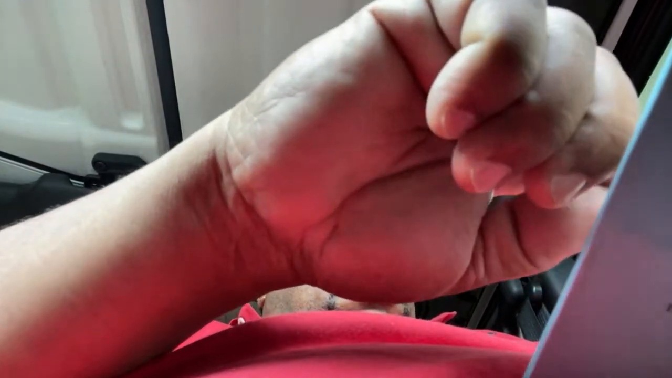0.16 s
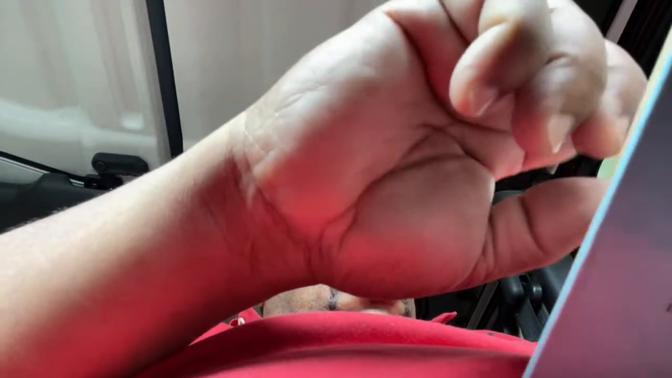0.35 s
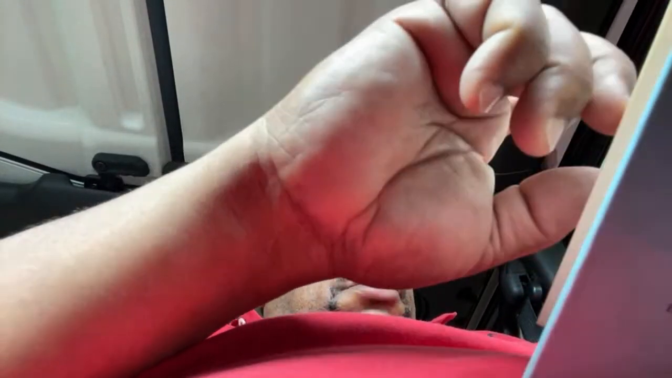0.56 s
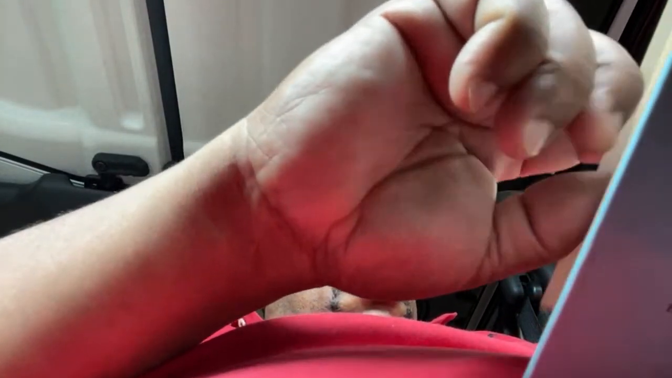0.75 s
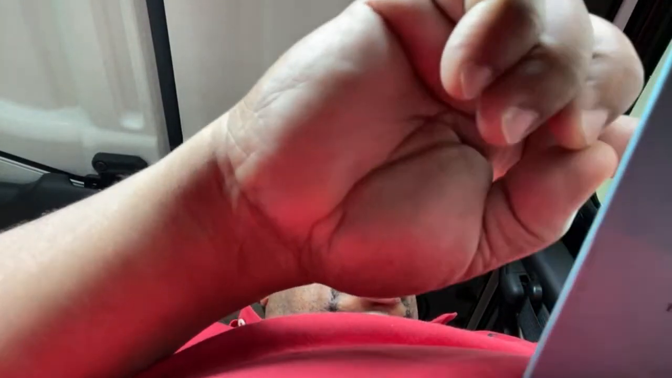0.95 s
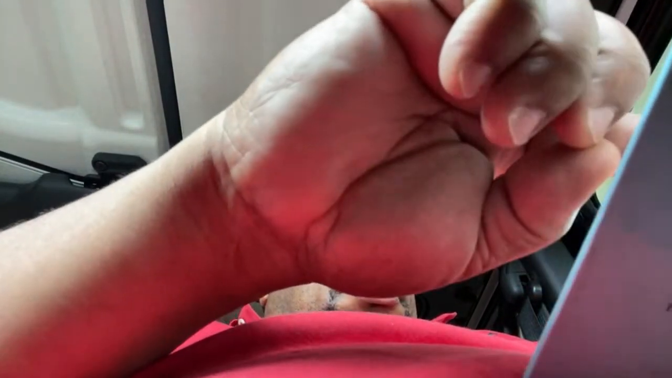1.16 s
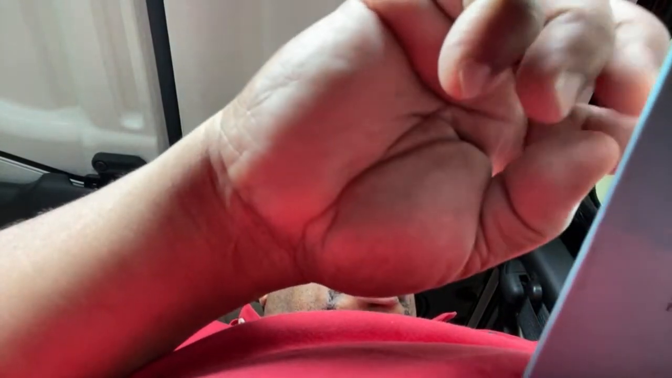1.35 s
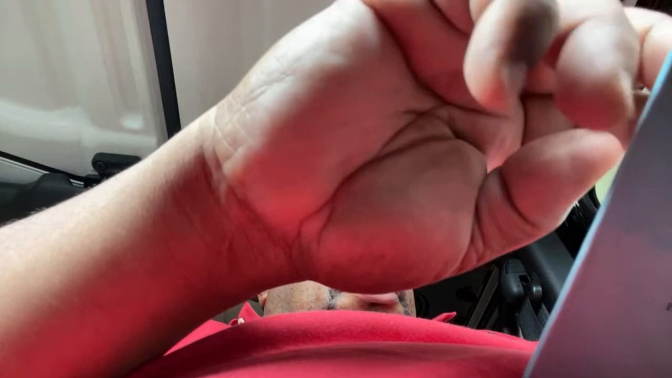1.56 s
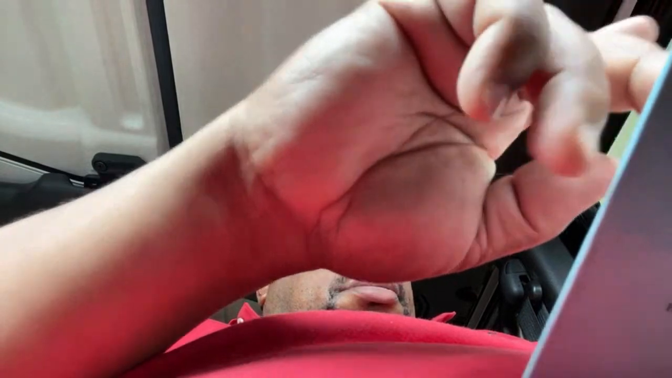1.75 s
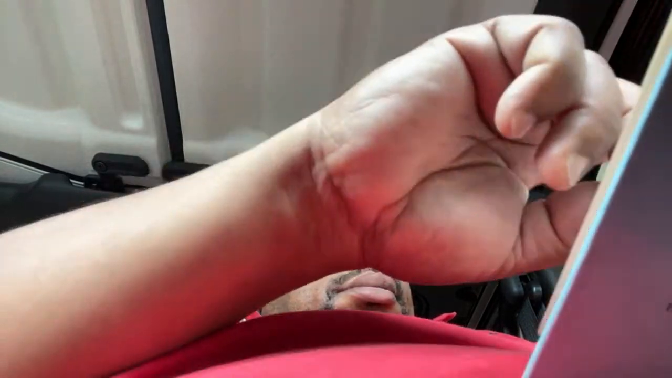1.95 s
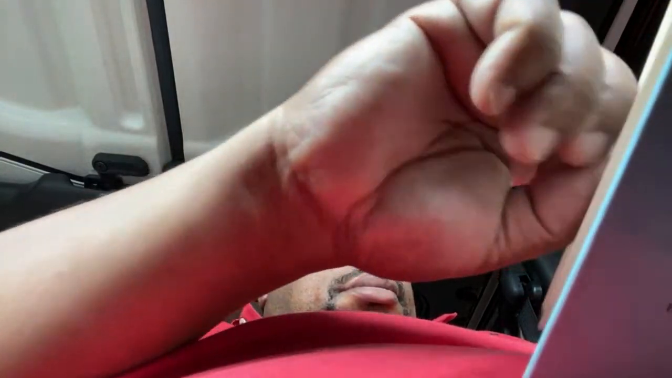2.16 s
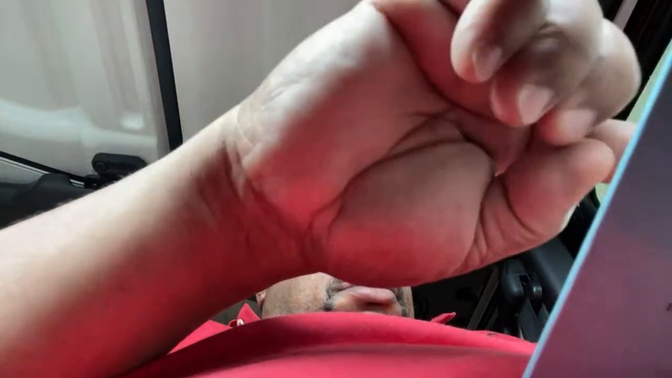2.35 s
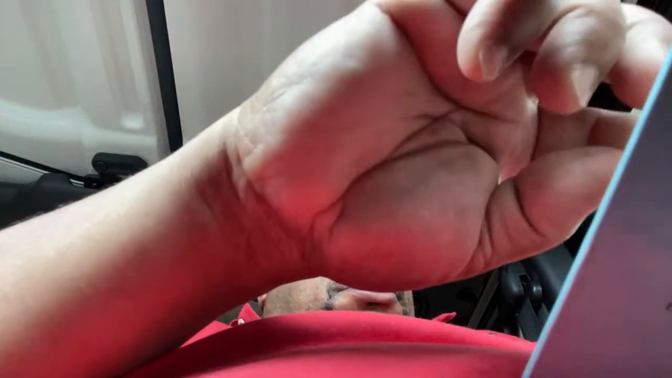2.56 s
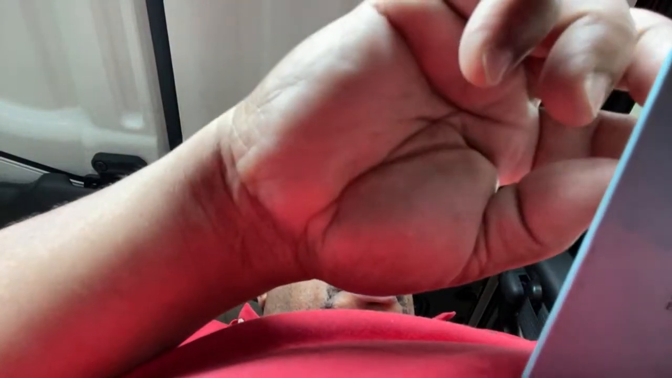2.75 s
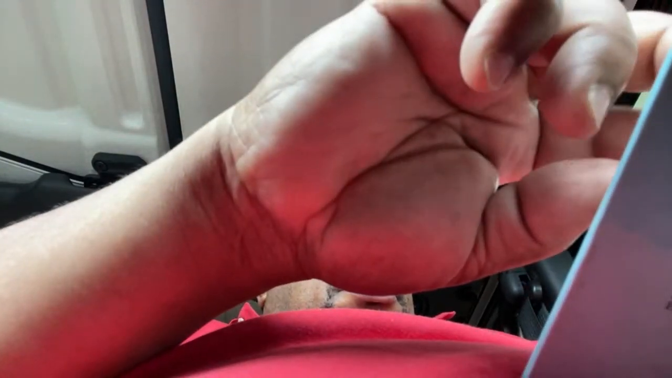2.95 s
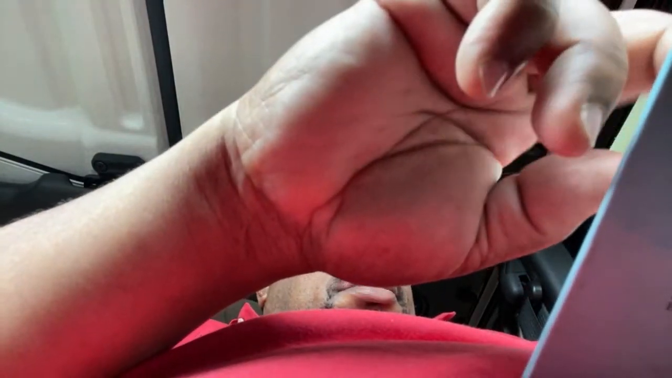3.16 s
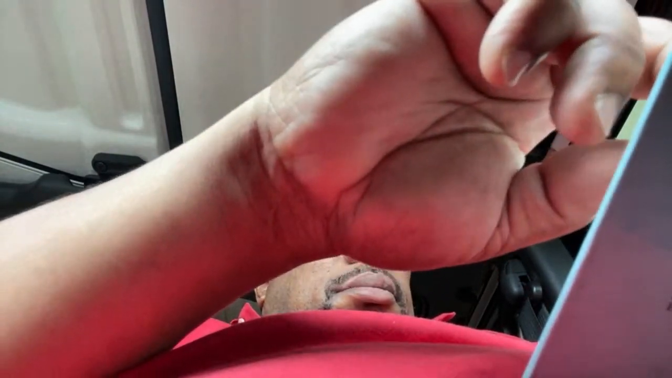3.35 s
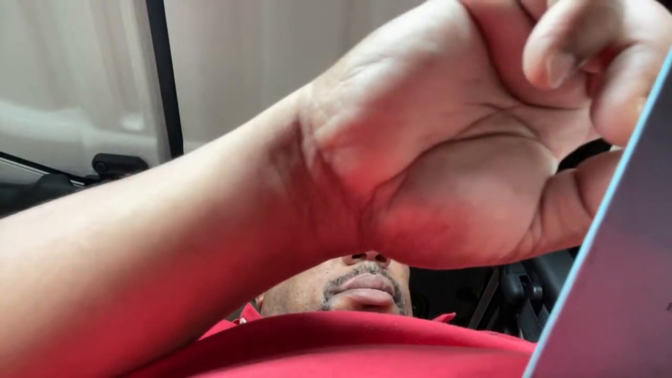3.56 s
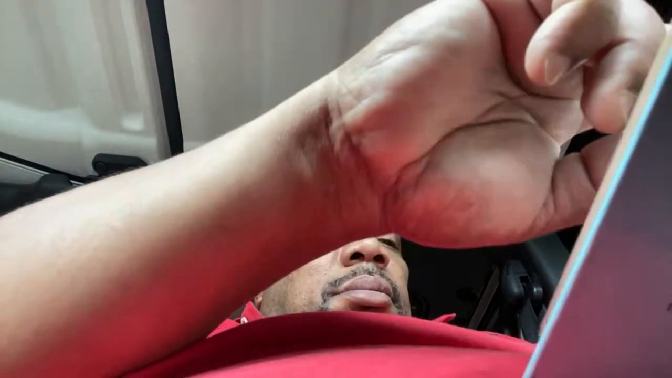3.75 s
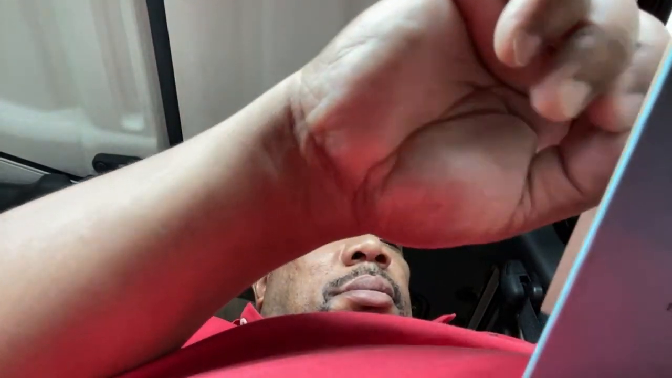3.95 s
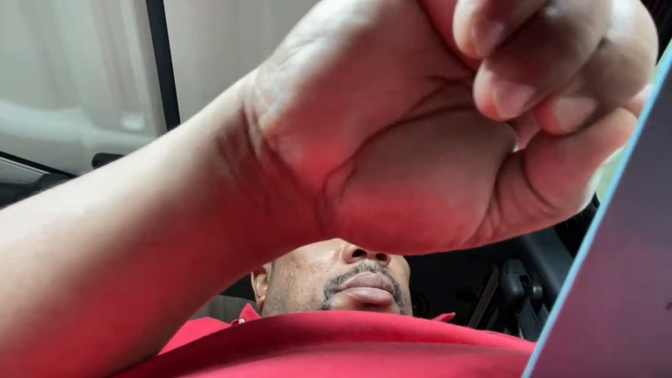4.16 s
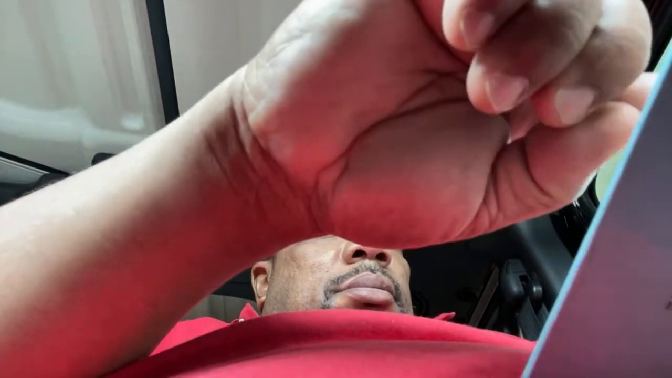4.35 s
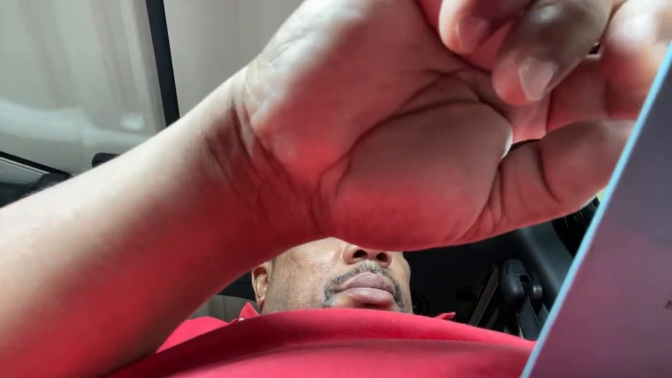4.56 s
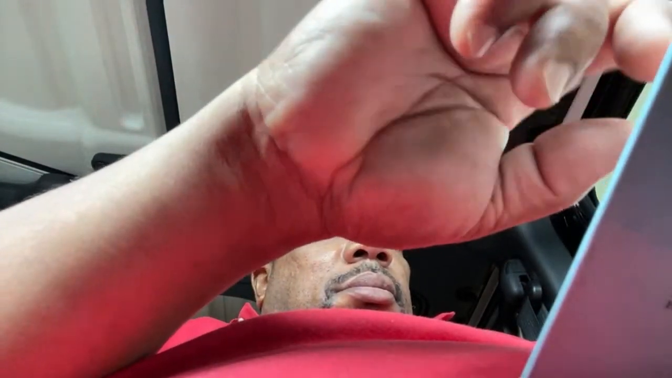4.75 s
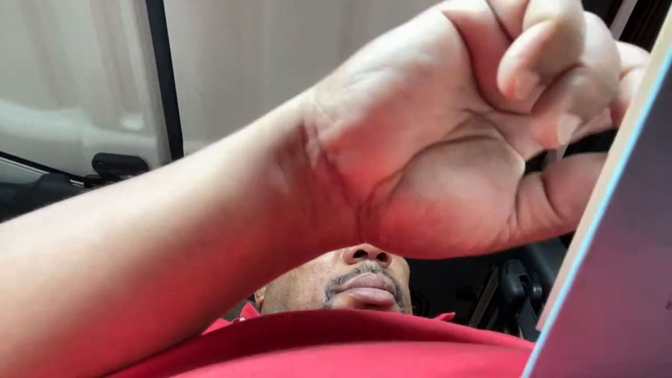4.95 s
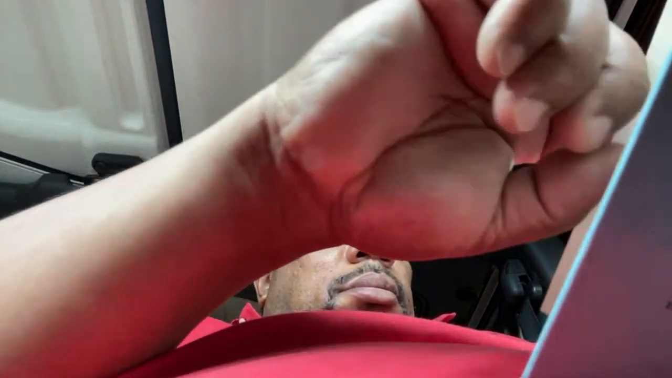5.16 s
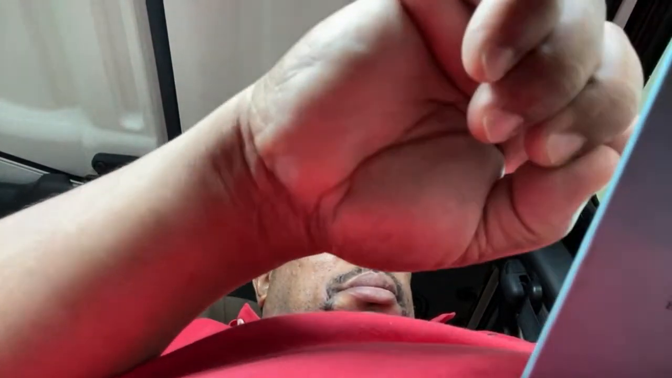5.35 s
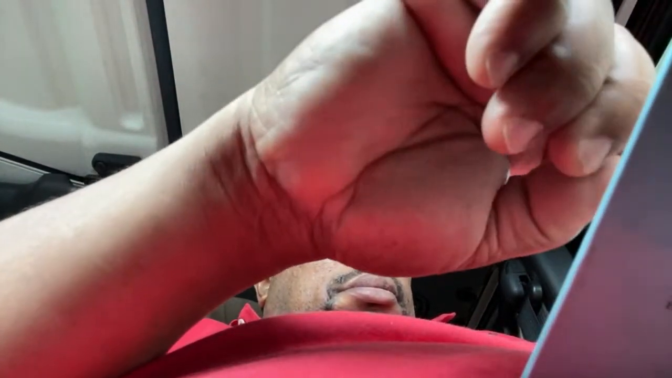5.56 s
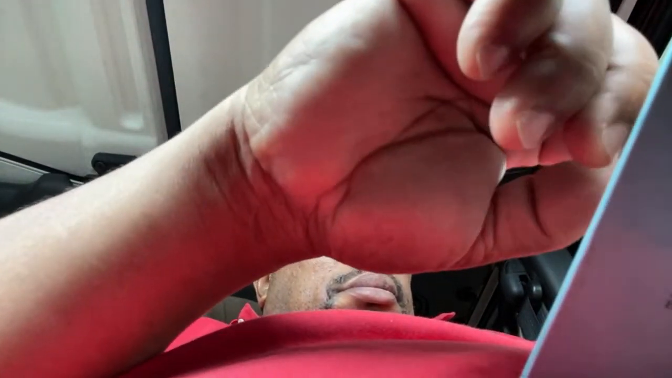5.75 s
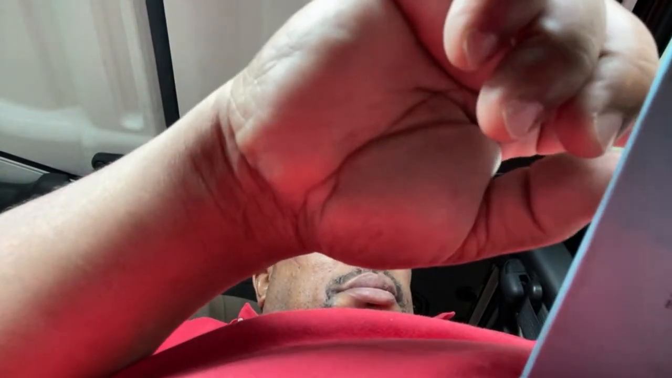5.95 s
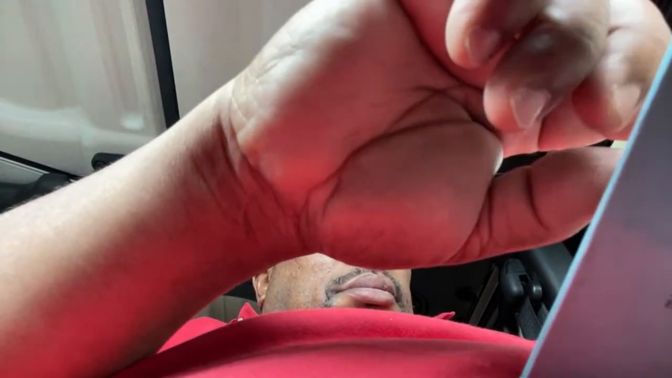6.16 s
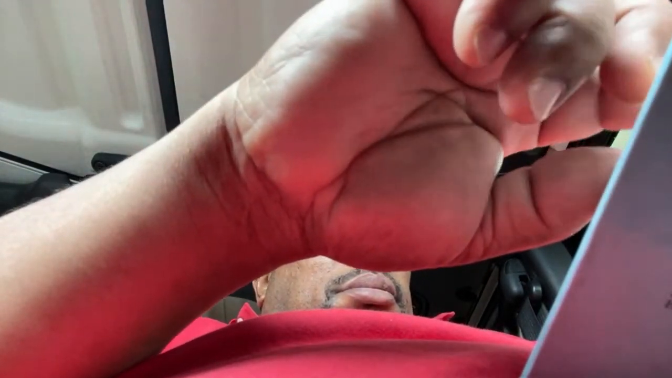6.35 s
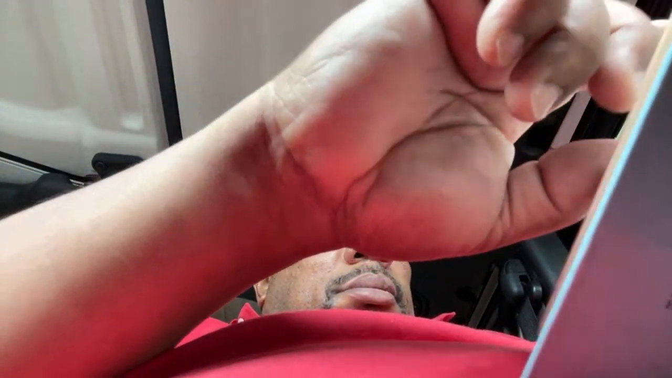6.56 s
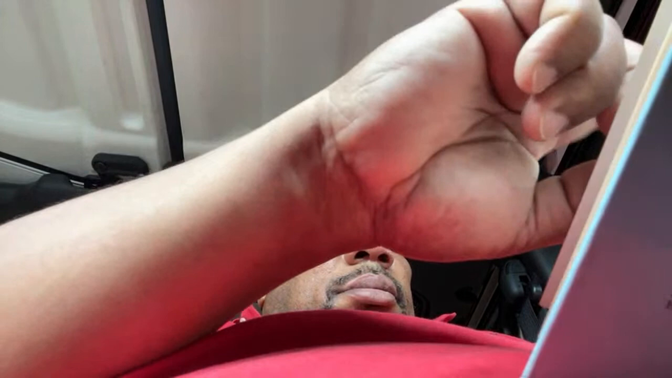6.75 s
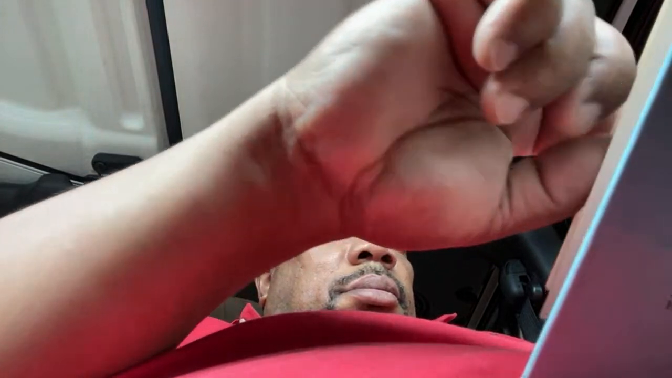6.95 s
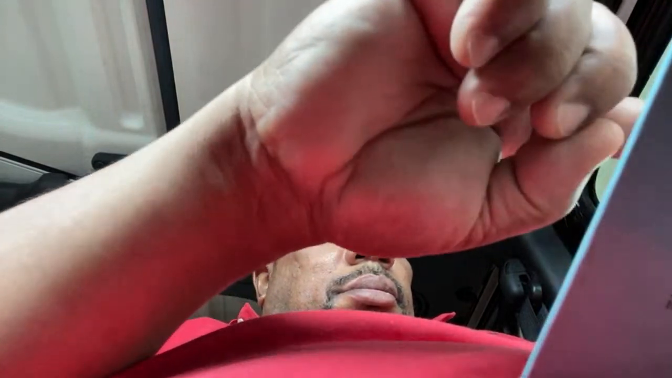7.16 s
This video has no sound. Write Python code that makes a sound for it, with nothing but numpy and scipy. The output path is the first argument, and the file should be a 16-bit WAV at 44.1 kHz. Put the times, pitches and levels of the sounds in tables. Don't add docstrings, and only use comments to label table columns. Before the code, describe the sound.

The setting is the small, dry cabin of a parked vehicle, heard through a close speech microphone with little deep bass or extreme treble. A faint, steady ventilation hum, mostly low-mid and airy, runs throughout above a very soft, slightly flickering rumble. For the first two seconds there are only tiny skin ticks, around 0.4 and 1.3, and dull low bumps through the seat. At about 2.05-2.11 a fingertip presses the tablet: a crackly onset, then a loud, hard, bright click with a thin slab knock and glassy edge, gone almost at once. Around 3.89-3.97 comes a softer, gritty double click, scratchier then duller. At 5.09 a compact, woody-glassy tap sounds. Faint ticks and thuds continue, including a tick at 5.6 and bumps after 6.1. At 6.92 a last, very light touch barely clicks, and the hum continues to about 7.2.

```python
import sys
import numpy as np
from scipy import signal
from scipy.io import wavfile
from scipy.ndimage import uniform_filter1d

SR = 44100
rng = np.random.default_rng(int(sys.argv[2]) if len(sys.argv) > 2 else 0)


def transcribe(u):
    v = np.clip(np.atleast_2d(u).T, -1, 1)
    q = np.round(v * 32767).astype(np.int16)
    wavfile.write(sys.argv[1], SR, q)


def level_to_linear(level):
    exponent = np.asarray(level, float) / 20
    return 10 ** exponent


N = 317017

# peak time in seconds, slab level in dB, frame level in dB, glass level in dB.
SLIPS = [(2.0502, -39.5, -45, -56), (2.0535, -46, -33, -52), (2.067, -42, -34, -52),
         (2.0716, -42, -25.5, -41), (2.077, -36, -27, -34), (2.0837, -5, -17, -11), (2.088, -38, -23, -21),
         (2.0918, -15, -25, -30), (2.096, -26, -30, -24.5), (2.1024, -26, -29, -34),
         (2.11, -25, -29.5, -43), (3.8855, -26, -42, -53), (3.8963, -32, -36, -38), (3.8994, -20, -30, -23),
         (3.903, -21, -25, -24), (3.906, -34, -20.5, -24), (3.9131, -24.5, -33, -33),
         (3.9222, -27, -28, -38), (3.9285, -32, -30, -45), (3.9425, -24.5, -43, -48),
         (3.9485, -29.5, -36, -53), (3.954, -30, -30.5, -60), (3.9628, -42, -28.5, -58),
         (5.0877, -24.5, -39, -32), (5.0935, -19, -32, -24), (5.0978, -17.5, -32, -27),
         (5.1055, -25, -33, -37), (6.913, -47, -45.5, -47), (6.917, -32, -51, -55),
         (6.9202, -31.5, -52, -57)]
# start in seconds, slab pitch in Hz, frame pitch in Hz, skin release in seconds.
PITCHES = [
    (0, 1250, 2400, 2.08),
    (2.075, 1215, 2750, 2.131),
    (2.2, 1170, 2250, 3.968),
    (4.5, 1150, 2650, 5.134),
    (6, 1290, 2650, 6.927),
]
# start in seconds, boost of the longest-ringing glass mode in dB,
# tilt of the glass modes around it in dB per octave, glass pitch scatter as a fraction, scratch level in dB.
LANDINGS = [
    (0, -1, -5, 0.05, -5),
    (3, -3, 4, .14, -1),
    (4.5, 4, 0, .06, -4),
    (6, -5, -1, .1, 1),
]
# slab in dB, frame in dB, glass in dB.
CHATTER_DROP_DB = [6.5, 4.5, 5]
# factor on the frame pitch, level in dB, t60 in seconds.
FRAME_MODES = [(.8, -7, 0.016), (1, -3, 0.012), (1.2, -10.5, 0.029), (1.42, -19, 0.013)]
# pitch in Hz, level in dB, t60 in seconds.
GLASS_MODES = [(4085, -14.5, 0.031), (4280, -10, 0.0058), (4900, 2, 0.025), (5470, -10, 0.028),
               (6340, -3, .02), (6980, -12, 0.0086), (7470, -22, 0.014), (8400, -39, 0.019)]
# time in seconds, peak level in dB, pitch in Hz.
TICKS = [(0.393, -49.5, 6320), (1.2994, -54, 6270), (2.187, -54, 5700), (2.2338, -52, 6100),
         (2.2952, -54, 6340), (2.517, -49, 6740), (4.2074, -49.5, 6340), (4.3695, -51.5, 5820),
         (5.624, -47, 6410), (6.979, -58, 6600)]
# time in seconds, peak level in dB, pitch in Hz.
THUDS = [(0.555, -51.5, 220), (0.869, -58, 186), (1.064, -62, 129), (1.176, -47.5, 219), (1.393, -60, 191),
         (1.804, -56, 153), (2.075, -48.5, 107), (2.522, -56, 200), (2.652, -55, 234), (2.733, -56, 164),
         (3.461, -60, 220), (3.894, -60, 180), (4.132, -57, 240), (4.196, -56, 228), (4.371, -56, 236),
         (4.497, -57, 236), (5.006, -53, 170), (5.316, -61, 199), (5.626, -62, 148), (6.143, -49.5, 210),
         (6.566, -51, 210), (6.765, -51.5, 210)]
# frequency in Hz, density in dB per Hz.
HUM_SPECTRUM = [(265, -25.5), (318, 1), (400, -7.5), (560, -6), (860, -9.5), (1000, -14.5), (1350, -20),
                (1690, -16), (2500, -24), (3100, -21.5), (3900, -26.5), (5000, -24), (6700, -25.5),
                (9000, -66.5)]
# frequency in Hz, density in dB per Hz.
RUMBLE_SPECTRUM = [(25, -25.5), (60, -10), (120, -3), (170, 0.5), (260, -3.5), (400, -27.5)]
# time in seconds, rumble level in dB.
RUMBLE_LEVEL = [(0, -73), (1.4, -69), (2.05, -75), (2.7, -73), (7.19, -75)]

CHATTER_S, CHATTER_MOST = 0.004, 5
CHATTER_SCATTER_DB, CHATTER_JITTER_S = 5, 0.0015
SLAB_WANDER, FRAME_WANDER = 0.22, 0.14
SLAB_RISE_MS, FRAME_RISE_MS, GLASS_RISE_MS = 1.94, 2.195, 2.1
SLAB_T60_S, SCRATCH_T60_S, CABIN_T60_S = 0.0072, 0.014, 0.055
SCRATCH_LOW_HZ, SCRATCH_HIGH_HZ = 2600, 7220
TOUCH_LOW_HZ, LEAD_S = 810, 0.0007
TICK_MS, TICK_DULL_DB = 13.7, -4
THUD_MS = 25.0
CABIN_DB, HUM_DB, HISS_DB = -14, -52, -94


def touches():
    slips = chatter()
    out = slab(slips)
    factor, frame_mode_db, frame_t60 = np.transpose(FRAME_MODES)
    glass_hz, base_db, glass_t60 = np.transpose(GLASS_MODES)
    longest_hz = glass_hz[np.argmax(glass_t60)]
    rubs = scratches(len(slips))
    lucks = rng.random((len(slips), 2, 16))
    for (s, _, frame_db, glass_db, _, frame_hz), luck, rub in zip(slips, lucks, rubs):
        _, longest_db, tilt_db, scatter, scratch_db = landing(s)
        picked_db = base_db + longest_db * (glass_hz == longest_hz) + tilt_db * np.log2(glass_hz / longest_hz)
        frame = ring(frame_hz * factor, frame_mode_db, frame_t60, FRAME_RISE_MS, 0.07, luck[0])
        glass = ring(glass_hz, picked_db, glass_t60, GLASS_RISE_MS, scatter, luck[1])
        scratch = level_to_linear(scratch_db - 2) * rub * swell(GLASS_RISE_MS, SCRATCH_T60_S)
        add(out, s - FRAME_RISE_MS / 1000, level_to_linear(frame_db) * frame)
        add(out, s - GLASS_RISE_MS / 1000, level_to_linear(glass_db - 2) * (glass + scratch))
    return out


def chatter():
    rows = []
    luck = rng.random((len(SLIPS), CHATTER_MOST + 1, 6)) - 0.5
    next_s = [row[0] for row in SLIPS[1:]] + [np.inf]
    for (s, *firm_db), until, draws in zip(SLIPS, next_s, luck):
        _, slab_hz, frame_hz, lift_s = [row for row in PITCHES if row[0] <= s][-1]
        for k, draw in enumerate(draws):
            if k > 0 and s + (k + 0.5) * CHATTER_S >= min(until, lift_s):
                continue
            loose = min(k, 1)
            at = s + k * CHATTER_S + loose * CHATTER_JITTER_S * draw[0]
            scatter_db = loose * CHATTER_SCATTER_DB * 2 * draw[1:4]
            levels_db = firm_db - k * np.array(CHATTER_DROP_DB) + scatter_db
            slab_now_hz = slab_hz * (1 + SLAB_WANDER * draw[4])
            frame_now_hz = frame_hz * (1 + FRAME_WANDER * draw[5])
            rows.append((at, *levels_db, slab_now_hz, frame_now_hz))
    return rows


def slab(slips):
    s, slab_db, hz = np.transpose(slips)[[0, 1, 4]]
    level = np.zeros(N)
    for at, db in zip(s, slab_db):
        add(level, at - SLAB_RISE_MS / 1000, level_to_linear(db) * swell(SLAB_RISE_MS, SLAB_T60_S))
    pitch_hz = np.interp(np.arange(N) / SR, s, hz)
    return level * np.sin(2 * np.pi * np.cumsum(pitch_hz) / SR)


def ring(hz, db, t60, rise_ms, spread, luck):
    t = np.arange(SR // 20) / SR
    shift, phase = luck[:2 * len(hz)].reshape(2, -1, 1)
    shifted_hz = hz[:, None] * (1 + spread * (shift - 0.5))
    waves = np.sin(2 * np.pi * (shifted_hz * t + phase))
    modes = level_to_linear(db)[:, None] * swell(rise_ms, t60[:, None]) * waves
    return modes.sum(0) / np.linalg.norm(level_to_linear(db))


def scratches(count):
    band = signal.butter(3, [SCRATCH_LOW_HZ, SCRATCH_HIGH_HZ], "band", fs=SR, output="sos")
    grit = signal.sosfilt(band, rng.standard_normal((count, SR // 20)))
    return evened(signal.sosfilt(signal.butter(12, SCRATCH_HIGH_HZ, fs=SR, output="sos"), grit))


def landing(s):
    return [row for row in LANDINGS if row[0] <= s][-1]


def swell(rise_ms, t60):
    t = np.arange(SR // 20) / SR
    rise_s = max(rise_ms, 0.3) / 1000
    rise = np.sin(np.pi / 2 * np.minimum(t / rise_s, 1)) ** 2
    return rise * level_to_linear(-60 * np.maximum(t - rise_s, 0) / t60)


def cabin(x):
    t = np.arange(SR // 6) / SR
    sign = rng.choice([-1.0, 1.0], len(t))
    present = (rng.random(len(t)) < 0.12) * (t > 0.002)
    taps = sign * present * level_to_linear(-60 * t / CABIN_T60_S)
    return signal.oaconvolve(x, taps / np.linalg.norm(taps))[:N]


def ticks():
    out = np.zeros(N)
    u = np.arange(2000) / SR * 1000 / (0.22 * TICK_MS)
    puff = u * np.exp(1 - u)
    for (s, db, hz), grit in zip(TICKS, rng.standard_normal((len(TICKS), 2, 2000))):
        bright = evened(signal.lfilter(*signal.iirpeak(hz, 5.5, SR), grit[0]))
        dull = evened(signal.lfilter(*signal.iirpeak(3600, 1.1, SR), grit[1]))
        add(out, s - 0.002, level_to_linear(db - 6.5) * (bright + level_to_linear(TICK_DULL_DB) * dull) * puff)
    return signal.sosfilt(signal.butter(10, 7100, fs=SR, output="sos"), out)


def thuds():
    out = np.zeros(N)
    u = np.linspace(0, 1, int(THUD_MS * SR / 1000))
    for (s, db, hz), luck in zip(THUDS, rng.random((len(THUDS), 2))):
        turns = np.cumsum(hz * (1.15 - 0.32 * u)) / SR
        push = np.sin(2 * np.pi * (turns + luck[0]))
        push += 0.39 * np.sin(2 * np.pi * (0.7 * turns + luck[1]))
        add(out, s - 0.004, level_to_linear(db) * push * np.sin(np.pi * u ** 1.25) ** 2)
    return out


def hum():
    return level_to_linear(HUM_DB) * noise(HUM_SPECTRUM, patchy_db=1.26, flicker_db=0.47, size=2048)


def rumble():
    level_db = np.interp(np.arange(N) / SR, *np.transpose(RUMBLE_LEVEL))
    return level_to_linear(level_db) * noise(RUMBLE_SPECTRUM, patchy_db=-0.5, flicker_db=2.0, size=1024)


def noise(spectrum, patchy_db, flicker_db, size):
    hop = size // 4
    frames, hz = N // hop + 5, np.fft.rfftfreq(size, 1 / SR)
    real, imag, patches = rng.standard_normal((frames, len(hz), 3)).T
    patches = uniform_filter1d(patches, size=9, axis=0)
    patches = evened(uniform_filter1d(patches, size=9, axis=1))
    flicker = evened(uniform_filter1d(rng.standard_normal(frames), size=4))
    f, level_db = np.transpose(spectrum)
    shape_db = np.interp(np.log(hz + 1), np.log(f), level_db, left=-120, right=-120)
    z = (real + 1j * imag) * level_to_linear(shape_db[:, None] + patchy_db * patches + flicker_db * flicker)
    return evened(signal.istft(z, nperseg=size, noverlap=size - hop)[1][:N])


def evened(x):
    return x / np.sqrt(np.mean(x ** 2) + 1e-20)


def add(mix, s, sound):
    part = mix[round(s * SR):][:len(sound)]
    part += sound[:len(part)]


def scene():
    touch = touches()
    touch = touch + level_to_linear(CABIN_DB) * cabin(touch)
    touch = signal.sosfilt(signal.butter(6, TOUCH_LOW_HZ, "high", fs=SR, output="sos"), touch)
    touch = np.roll(touch, -round(LEAD_S * SR))
    return (touch + ticks() + thuds() + hum() + rumble())[None]


def band_limit(x):
    return signal.sosfilt(signal.butter(12, 15655, fs=SR, output="sos"), x)


def record(dry):
    top_cut = signal.firwin(255, 9300, window=("kaiser", 9), fs=SR)
    narrow = signal.oaconvolve(dry, top_cut[None], "same")
    narrow = signal.sosfilt(signal.butter(2, 70, "high", fs=SR, output="sos"), narrow)
    hissy = narrow + level_to_linear(HISS_DB) * rng.standard_normal(dry.shape)
    return band_limit(hissy)


dry = scene()
out = record(dry)
transcribe(out)
```